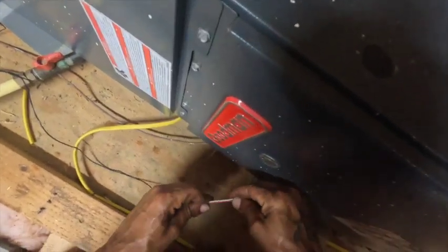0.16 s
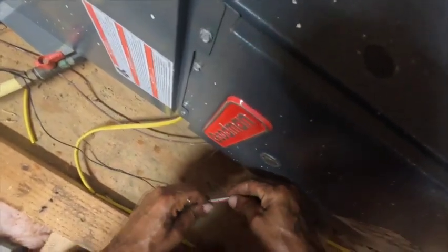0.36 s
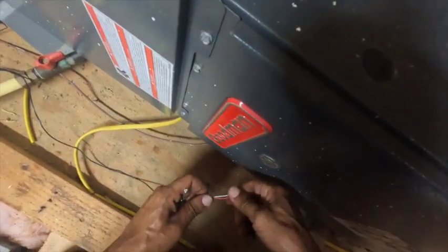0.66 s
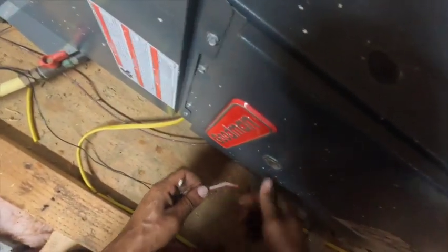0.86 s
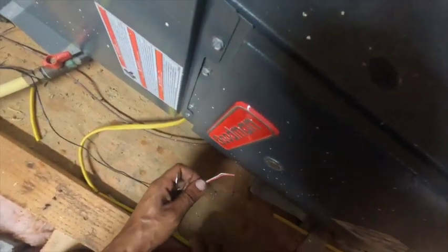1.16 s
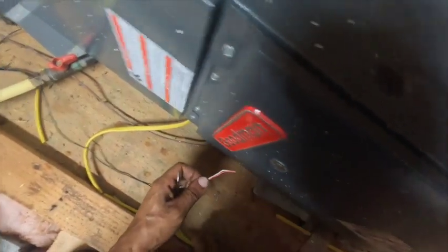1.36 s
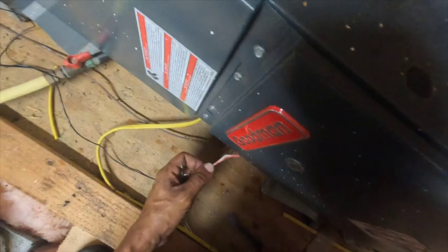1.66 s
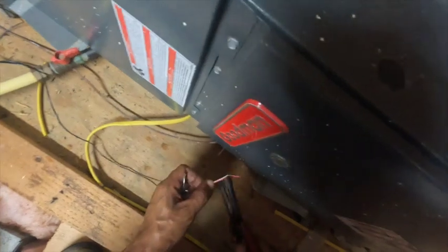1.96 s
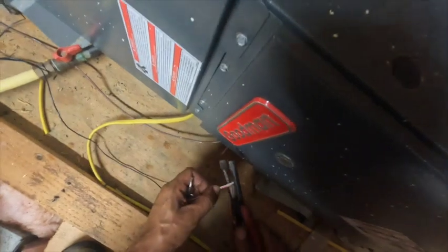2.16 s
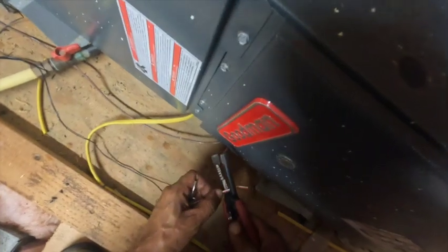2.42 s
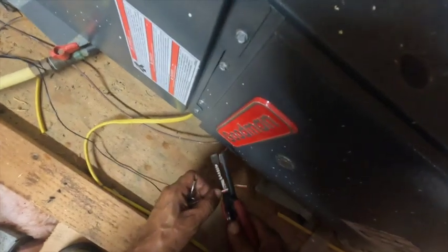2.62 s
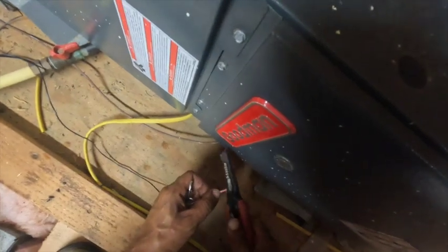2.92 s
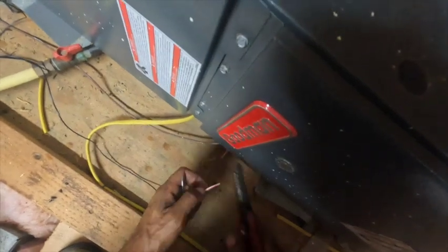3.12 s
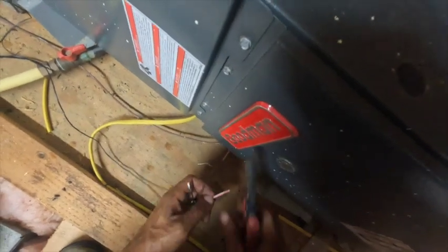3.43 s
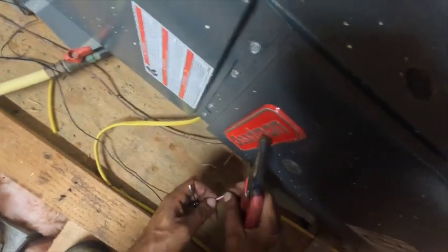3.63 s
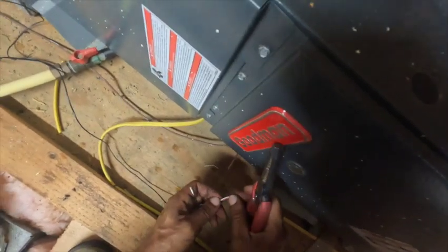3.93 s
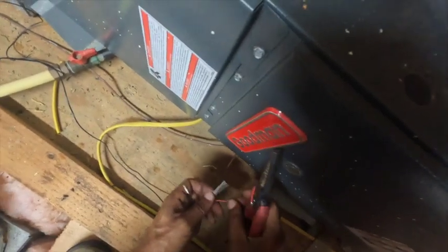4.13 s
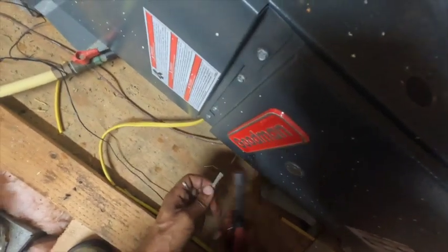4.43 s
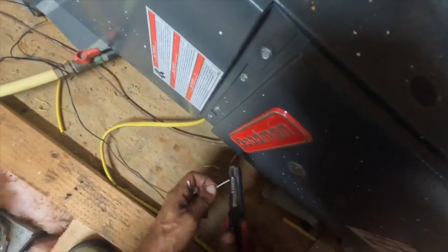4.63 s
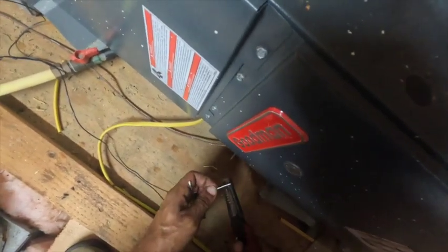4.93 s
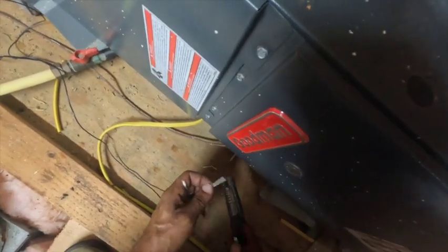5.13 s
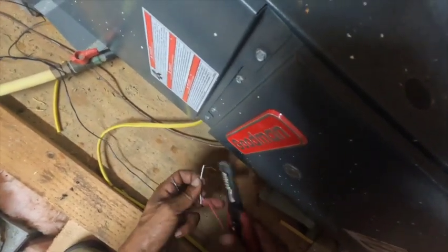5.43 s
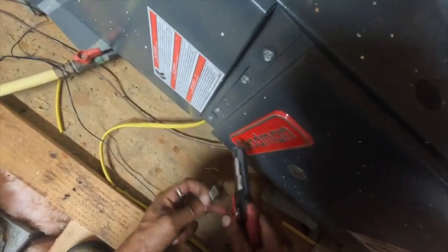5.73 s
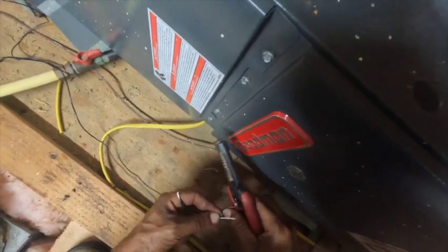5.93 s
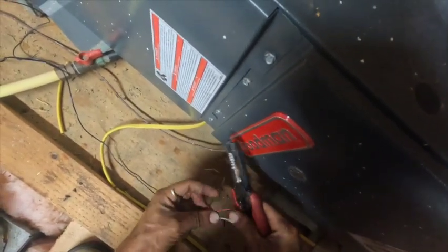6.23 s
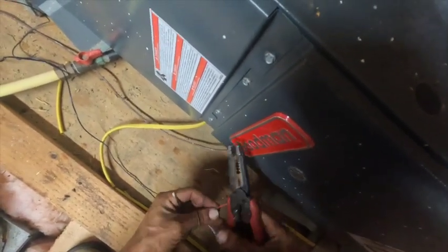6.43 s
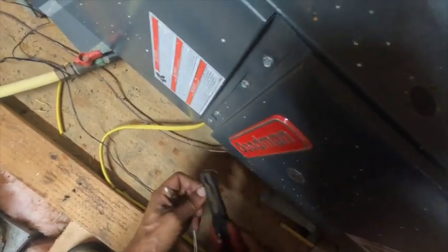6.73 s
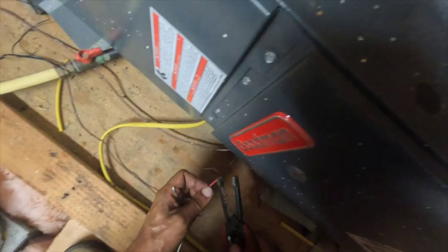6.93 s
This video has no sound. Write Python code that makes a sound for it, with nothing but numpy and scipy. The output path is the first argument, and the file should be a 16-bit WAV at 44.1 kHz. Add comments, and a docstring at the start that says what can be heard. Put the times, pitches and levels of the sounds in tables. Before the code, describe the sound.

A steady deep blower rumble with soft hum and hiss fills an attic, heard through a small camera microphone near the hands. Strippers tick faintly, bite through thin wire with a sharp dry snap, and click open. A sheet-metal panel is bumped, with a quick bouncing clatter and short boom. Afterwards only thin high squeaks, light scraping, a tiny tick and dull handling bumps remain.

```python
"""Hand wire strippers in an attic: ticks at 1.6 s, a snip through thin wire at 2.9 s, jaws springing open at 3.1 s.
One knock on a sheet-metal furnace cabinet at 3.6 s, then thin squeaks and scrapes to 6.7 s, a soft tick at 4.8 s.
Contacts are swung-up steel modes over coloured grit; the panel is decaying modes under band-damped noise.
Throughout: a blower's low rumble, hum and duct hiss, camera hiss throbbing with its frames, soft handling bumps."""
import sys
import numpy as np
from scipy import signal
from scipy.fft import rfft, irfft
from scipy.io import wavfile
from scipy.ndimage import uniform_filter1d

SR = 44100
rng = np.random.default_rng(int(sys.argv[2]) if len(sys.argv) > 2 else 0)


def unload_wav(signal):
    """Save mono or channel-first audio to the path in sys.argv[1] as 16-bit WAV at rate SR, clipped to [-1, 1]."""
    wavfile.write(
        sys.argv[1],
        SR,
        np.round(np.clip(np.atleast_2d(signal).T, -1, 1) * 32767).astype(np.int16),
    )


N = 311787
T = np.arange(N) / SR
HZ = np.fft.rfftfreq(N, 1 / SR) + 1e-3

# Colour tables: relative spectral density. Pan: left minus right.
# Steel contacts: [t/s, level/dB, main ring f/Hz, contact/ms, upper ring/dB re main, body/dB, echo send/dB]
CONTACTS = [(1.564, -37.5, 5150, 4.6, 4, -7, -1.5), (1.569, -46.5, 2820, 6.7, -25, 7, -12),
            (1.572, -43, 4730, 3.5, -8, -18, -6), (1.582, -45, 4850, 3.4, 3, 5, -7),
            (2.925, -36.5, 5110, 1.7, -16, -5, -7), (2.9429, -28, 4970, 2.6, -7, 9, -12),
            (2.9468, -8.5, 4810, 2.46, -15, -4, -11), (2.9509, -15.5, 4380, 0.76, -16, -4, -18),
            (2.9565, -26, 4500, 1.7, -17, 4, -10), (2.9632, -40, 4930, 1.2, -12, -6, -10),
            (3.119, -46, 4840, 5, -16, 5, -4), (3.1248, -31.5, 5190, 3.2, -11, 1, -2.5),
            (3.135, -48, 4530, 5, 9, 0, -5), (3.2038, -37.5, 4240, 2.3, 0, 5, -1),
            (3.2074, -42.5, 2900, 4.2, -8, 9, -5), (4.778, -54, 2900, 4.1, -20, -7, -13)]
# Handles ringing on faintly: [f/Hz, relative level/dB, t60/s]
HANDLE_MODES = [(1264, -40, 0.052), (1696, -36.5, 0.031), (2020, -36, 0.057), (3300, -62, 0.04)]
# Jaws as the microphone cavity colours them: [f/Hz, level/dB]
SNAP_COLOUR = [(410, -68), (700, -32), (1970, -14), (2730, -18), (3140, -17), (3900, -9), (4820, -10.5),
               (5630, -16.5), (6750, -3), (7250, -23), (8050, -28), (8740, -16.5), (9950, -21.5),
               (11300, -27), (12200, -26), (15500, -50)]
# Snap as it comes back from all sides: [f/Hz, level/dB]
SCATTER_COLOUR = [(880, -31), (1500, -24), (1720, -8.5), (2120, -25), (2340, -16), (3060, -5.5), (3540, -9),
                  (3780, -5), (4540, -4.5), (4950, -3), (5950, -11.5), (6490, -10.5), (7570, -24),
                  (10400, -25), (15000, -41)]
EDGE_DB, EDGE_DB_PER_DB = 9, 0.4  # harder contacts have sharper edges
UPPER_RING_HZ, RING_T60_S = 6760, 0.0018
GRIT_DB, GRIT_SHARE = -6, 0.73  # re modes; part of a contact in which grit fades
BODY_TOP_HZ = 4120
HAND_PAN_DB = -0.5
TAIL_DB, TAIL_T60_S, TAIL_ALIKE = -23.5, 0.19, 1  # attic echoes; channel likeness 0-1

# Thin squeaks of the tool: [t/s, length/s, start f/Hz, rise/Hz, level/dB, octave/dB re fundamental]
SQUEAKS = [(4.325, .13, 2810, 80, -75, -25), (4.505, .055, 4960, 60, -69.5, -13),
           (4.585, .05, 4960, 60, -69.5, -13), (4.905, .175, 5240, 180, -69.5, -25),
           (4.9, .09, 4850, 100, -72, -25), (4.99, .075, 3900, 60, -78, -25),
           (5.02, .1, 4900, 120, -72.5, -25), (5.5, .36, 4920, 60, -73.5, -13),
           (5.52, .38, 2720, 60, -81.5, -25), (6.5, .055, 2840, 60, -78, -25),
           (6.565, .09, 2800, 145, -73, -25)]
SQUEAK_BLUR_HZ, SQUEAK_FLUTTER_DB = 30, 2.2
SQUEAK_RISE_SHARE = 0.3  # time constant of the pitch rise, part of length
# A brief hiss swell, then jaws and fingers sliding along the wire from 4.86 s: [t/s, length/s, level/dB]
GRIT_SWELLS = [(3.3, .035, -67), (4.86, 0.22, -67.5), (5.477, 0.16, -68.5), (5.58, 0.4, -68.5)]
SCRAPE_HZ, SCRAPE_WIDTH_HZ, SCRAPE_ROUGH_DB = 5120, 1350, 1.5

# Knock on the cabinet, blow and bounces: [t/s, clatter level/dB, brightness/dB per octave]
KNOCKS = [(3.6409, -40, -0.5), (3.648, -39.5, 5), (3.681, -50, -4)]
# Lowest panel modes: [f/Hz, level/dB re BOOM_DB, t60/s]
PANEL_MODES = [(72.6, 0, 0.3), (130, -4.5, 0.27), (168, -4.5, 0.4), (203, 0, 0.37), (263, -13.5, 0.29),
               (230, -11, 0.33), (311.5, -14, 0.27), (700, -22, 0.15), (921, -11, 0.13), (1042, -9, 0.12),
               (1083, -6, .09), (1188, -13, 0.26), (1246, -10, 0.26), (1545, -24, 0.16), (1748, -12, 0.11),
               (2730, -12, 0.12)]
# Dense upper panel modes: [f/Hz, level/dB]
CLATTER_COLOUR = [(180, -38), (300, -1.5), (494, -14.5), (750, -11), (1090, -2), (1380, -3.5), (1820, -2.5),
                  (2350, -15), (2800, -3.5), (3510, -9.5), (4770, -4), (6170, -4.5), (6790, -0.5),
                  (8240, -24.5), (12300, -35), (14000, -53)]
# Their decay: [f/Hz, t60/s]
CLATTER_T60 = [(300, 0.34), (1200, 0.21), (3000, 0.24), (6000, 0.053), (12000, 0.055)]
BOOM_DB, SWING_CYCLES = -38.5, 1.5
KNOCK_PAN_DB = 1.5

# Soft bumps as hands and camera shift: [t/s at centre, level/dB, f/Hz, 1/e half-width/ms]
BUMPS = [(1.25, -68, 149, 170), (1.57, -56, 135, 32), (2.96, -55, 85.4, 50), (4.59, -55.5, 84, 64),
         (5.22, -63, 68, 67), (6.82, -58, 110, 63)]

# Blower hum through the floor boards: [f/Hz, level/dB]
HUM_COLOUR = [(32, -51), (55, -4.5), (65, -1), (86, -1.5), (141, -2), (173, -1), (277, -10.5), (310, -11.5),
              (463, -19.5), (850, -29.5), (1100, -27), (1870, -120)]
HUM_START_DB, HUM_SAG_DB_PER_S, HUM_DRIFT_DB = -61, 0.28, -1.9
# Duct hiss: [f/Hz, level/dB]
AIR_COLOUR = [(410, -7), (700, -10.5), (830, -11.5), (1020, -5), (1300, -0.5), (1420, -4.5), (1730, 2.5),
              (2320, -8), (2750, -4), (3140, -9.5), (4100, -13), (5330, -12.5), (9020, -120)]
AIR_DB = -67

# Camera hiss: [f/Hz, level/dB]
HISS_COLOUR = [(2350, -29.5), (4000, -6.5), (4960, 2), (5960, 1), (6330, -2.5), (6620, -2), (7110, -6.5),
               (8160, -14), (9530, -14), (10900, -14.5), (11500, -23.5), (13400, -28), (14400, -63),
               (15000, -37)]
HISS_DB = -66.5
FRAME_HZ = 30000 / 1001
# Two hiss swells per frame: [t/ms into frame, 1/e half-width/ms, mean swell/dB in the high band]
THROB = [(5.5, 5.0, 6.5), (22.2, 3.2, 8.0)]
ODD_FRAME_DB = 1

# Slow air pressure at the microphones, before gusts: [t/s, level/dB]
RUMBLE_LEVEL = [(0, -30), (1.5, -29.5), (3, -30), (3.8, -34), (4.7, -30), (7.07, -33.5)]
# Its spectrum: [f/Hz, level/dB]
RUMBLE_COLOUR = [(3, 2), (5, 9.5), (16, 14), (26, 1.5), (34, 1), (40, -10), (46, -41), (54, -10.5),
                 (62, -69), (120, -150)]
GUST_DB, GUST_RATE_HZ = 2.5, 14
LOW_PAN_DB = -4  # rumble, boom, bumps

# Likeness of the noise channels: [f/Hz, likeness 0-1]
ALIKE = [(60, 0.7), (130, 1), (290, 0.3), (640, 0.4), (1410, 0.66), (3100, 0.94), (6820, 1), (15000, 0.5)]
# Noise pan: [f/Hz, left minus right/dB]
NOISE_PAN = [(60, 2.5), (110, 1.5), (200, -7), (380, -6.5), (700, -7.5), (1290, -0.5), (2380, 4.5),
             (4400, -1), (8120, 0), (15000, 3.5)]
# Phase lead of left in noise; contacts take 1.6 times this: [f/Hz, lead/rad]
LEFT_LEAD = [(0, -0.086), (260, 0.51), (780, -1.32), (1720, -0.46), (2840, -1.23), (3360, -0.87),
             (3960, -1.1), (4220, -0.9), (5170, 0.25), (8960, 0.21), (10500, 0.37), (13100, -0.83),
             (15200, 0.11)]
TOP_HZ = 15600


def strippers():
    """Ticks, the snip with its rebounds, the jaws springing open: steel contacts and their echoes."""
    direct, sent = np.zeros((2, N)), np.zeros((1, N))
    for s, db, ring_hz, contact_ms, upper_db, body_db, echo_db in CONTACTS:
        edge_db = EDGE_DB + EDGE_DB_PER_DB * db
        ahead, around = undb(db) * strike(ring_hz, contact_ms, upper_db, body_db, edge_db)
        add(direct, s, sides(HAND_PAN_DB) * ahead)
        add(sent, s, undb(echo_db) * around[None])
    # round the camera body the two ports differ in phase
    turn = np.exp(.8j * over_hz(LEFT_LEAD) * np.array([[1], [-1]]))
    return irfft(rfft(direct + attic(sent[0])) * turn, N)


def strike(ring_hz, contact_ms, upper_db, body_db, edge_db):
    """Two jaw modes swing up during contact, over edge and handle grit; direct (peak 1) and scattered sound."""
    bins = np.fft.rfftfreq(4096, 1 / SR) + 1
    body_shelf_db = body_db / (1 + (bins / BODY_TOP_HZ) ** 8)
    edge_shelf_db = edge_db / (1 + (7800 / bins) ** 8)
    colour_db = body_shelf_db + edge_shelf_db
    snap = causal(np.maximum(over_hz(SNAP_COLOUR, bins), -70) + colour_db)
    snap = snap + undb(edge_db + body_db) * ring(HANDLE_MODES, count=4096)
    around = causal(np.maximum(over_hz(SCATTER_COLOUR, bins), -70) + colour_db)
    t = T[:1024]
    phase = t * 1000 / max(contact_ms, .2)
    touch = np.sqrt(phase) * np.exp(-phase ** 4)  # the edges part abruptly
    scratch = rng.standard_normal(len(t)) * touch * np.exp(-phase / GRIT_SHARE)
    grit = signal.fftconvolve(snap, scratch)
    swing = np.convolve(touch, 1000 ** (-t / RING_T60_S))[:len(t)]
    start = 2 * np.pi * rng.random(size=2)
    main = np.sin(2 * np.pi * ring_hz * t + start[0])
    upper = undb(upper_db) * np.sin(2 * np.pi * UPPER_RING_HZ * t + start[1])
    modes = swing * (main + upper)
    ahead = np.pad(modes / np.linalg.norm(modes), (0, len(grit) - len(t)))
    ahead = ahead + undb(GRIT_DB) * grit / np.linalg.norm(grit)
    return np.array([ahead, np.pad(around, (0, len(t) - 1))]) / np.abs(ahead).max()


def attic(x):
    """Dense short echoes from rafters and cabinet, building within about a millisecond."""
    t = T[:SR // 2]
    mid, side = rng.standard_normal((2, len(t)))
    echoes = np.array([mid + (1 - TAIL_ALIKE) * side, mid - (1 - TAIL_ALIKE) * side])
    echoes = echoes * 1000 ** (-t / TAIL_T60_S) * (1 - np.exp(-(t / 0.0005) ** 2))
    soft = signal.sosfilt(signal.butter(1, 7000, fs=SR, output="sos"), echoes)
    echoes = soft + (echoes - soft) * np.exp(-t / 0.017)  # the top dies first
    return undb(TAIL_DB) * signal.fftconvolve(x[None], echoes, axes=1)[:, :N]


def handling():
    """Squeaks: rising, blurred tones with their octave; scrapes: rough band-passed grit."""
    blur = np.cumsum(SQUEAK_BLUR_HZ * walk(300)) / SR
    flutter = undb(SQUEAK_FLUTTER_DB * walk(30))
    squeaks = 0
    for s, length, hz, rise_hz, db, octave_db in SQUEAKS:
        settle_s = SQUEAK_RISE_SHARE * length
        settling = rise_hz * settle_s * np.exp(-np.maximum(T - s, 0) / settle_s)
        phase = 2 * np.pi * ((hz + rise_hz) * T + settling + blur)
        tone = np.sin(phase) + undb(octave_db) * np.sin(2 * phase)
        squeaks = squeaks + np.sqrt(2) * undb(db) * window(s, length) * flutter * tone
    edges = [SCRAPE_HZ - SCRAPE_WIDTH_HZ / 2, SCRAPE_HZ + SCRAPE_WIDTH_HZ / 2]
    grit = signal.sosfilt(signal.butter(2, edges, "band", fs=SR, output="sos"), rng.standard_normal(N))
    grit = grit / np.std(grit) * undb(SCRAPE_ROUGH_DB * walk(50))
    swells = sum(undb(db) * window(s, length) for s, length, db in GRIT_SWELLS)
    return sides(HAND_PAN_DB) * (squeaks + grit * swells)


def cabinet():
    """A blow with two bounces on sheet metal: clatter with a decay per band, and a boom of low modes."""
    out, t = np.zeros((2, N)), T[:16384]
    bins = np.fft.rfftfreq(len(t), 1 / SR) + 1
    centres_hz = 300 * 2 ** np.arange(0, 5.6, .5)
    for s, clatter_db, bright_db in KNOCKS:
        mid, side = rfft(rng.standard_normal((2, len(t))))
        colour = undb(over_hz(CLATTER_COLOUR, bins) + bright_db * np.log2(bins / 2000))
        pair = np.array([mid + 0.35 * side, mid - 0.5 * side]) * colour
        pair = pair / np.std(irfft(pair))
        clatter = 0
        for hz, t60 in zip(centres_hz, over_hz(CLATTER_T60, centres_hz)):
            band = np.clip(1 - 2 * abs(np.log2(bins / hz)), 0, 1)
            clatter = clatter + irfft(pair * band) * 1000 ** (-t / t60)
        onset = 1 - np.exp(-t / 0.00014)
        add(out, s, sides(KNOCK_PAN_DB) * undb(clatter_db) * clatter * onset)
    # each mode needs a few cycles to swing up
    boom = 0
    for mode in PANEL_MODES:
        boom = boom + ring([mode], count=len(t)) * (1 - np.exp(-t * mode[0] / SWING_CYCLES))
    add(out, KNOCKS[0][0], sides(LOW_PAN_DB) * undb(BOOM_DB) * boom)
    return out


def bumps():
    """Short dull thuds carried through the camera body: low band-passed noise in bell envelopes."""
    out = 0
    for s, db, hz, ms in BUMPS:
        band = signal.butter(2, [0.31 * hz, 1.45 * hz], "band", fs=SR, output="sos")
        thud = signal.sosfilt(band, rng.standard_normal(N))
        out = out + undb(db) * thud / np.std(thud) * np.exp(-((T - s) * 1000 / ms) ** 2)
    return sides(LOW_PAN_DB) * out


def blower():
    """Hum in the boards and hiss from the ducts: coloured noise, each flickering a little."""
    flicker_db = HUM_DRIFT_DB * walk(1.1) + 0.81 * walk(13)
    hum = noise(HUM_COLOUR) * undb(HUM_START_DB - HUM_SAG_DB_PER_S * T + flicker_db)
    air = noise(AIR_COLOUR) * undb(AIR_DB + 0.5 * walk(0.42) + 1.05 * walk(13))
    return hum + air


def camera_hiss():
    """Hiss that swells in step with the frames, each swell its own size, strongest in the top octave."""
    period_ms = 1000 / FRAME_HZ
    throb_db = 0
    for at_ms, width_ms, swell_db in THROB:
        frame, ms = np.divmod(T * 1000 - at_ms + period_ms * 1.5, period_ms)
        size = 1 + 0.55 * np.tanh(rng.standard_normal(N // 1000))[frame.astype(int)]
        throb_db = throb_db + swell_db * size * np.exp(-((ms - period_ms / 2) / width_ms) ** 2)
    # every other frame draws more current
    throb_db = throb_db - throb_db.mean() + ODD_FRAME_DB * np.cos(np.pi * FRAME_HZ * (T - .039))
    hiss = noise(HISS_COLOUR) * undb(HISS_DB + 0.31 * walk(3.53))
    low = signal.sosfiltfilt(signal.butter(4, 8200, fs=SR, output="sos"), hiss)
    high = hiss - low
    return low * undb(0.55 * throb_db + 1.0 * walk(16)) + high * undb(throb_db + 0.61 * walk(38))


def rumble():
    """Slow pressure swings of the blower, mostly below hearing: one gusting noise wave at both ports."""
    wave = irfft(rfft(rng.standard_normal(N)) * undb(over_hz(RUMBLE_COLOUR)), N)
    fades = signal.windows.tukey(N, .015)  # short, at both ends, so the cut makes no click
    level = undb(curve(RUMBLE_LEVEL) + GUST_DB * walk(GUST_RATE_HZ))
    return sides(LOW_PAN_DB) * fades * wave / np.std(wave) * level


def noise(colour):
    """Stereo noise as two close microphone ports hear it; rms 1 in the mean of the channels."""
    mid, side = rfft(rng.standard_normal((2, N)))
    alike = np.clip(over_hz(ALIKE), 0, 1)
    half = undb(over_hz(NOISE_PAN) / 2) * np.exp(.5j * over_hz(LEFT_LEAD))
    mid, side = mid * np.sqrt(1 + alike), side * np.sqrt(1 - alike)
    spectra = np.array([(mid + side) * half, (mid - side) / half])
    pair = irfft(undb(over_hz(colour)) * spectra, N)
    return pair / np.std(pair.mean(axis=0))


def ring(modes, count):
    """Decaying sines from one blow, pitches a little different each time."""
    t = T[:count]
    hz, db, t60 = np.transpose(modes)[:, :, None]
    hz = hz * (1 + 0.0041 * rng.standard_normal(hz.shape))
    return (undb(db) * np.sin(2 * np.pi * hz * t) * 1000 ** (-t / t60)).sum(axis=0)


def causal(db):
    """Minimum-phase response with these dB at even frequency steps, by folded cepstrum; energy 1."""
    cepstrum = irfft(db * np.log(10) / 20)
    half = len(cepstrum) // 2
    cepstrum[1:half] *= 2
    cepstrum[half + 1:] = 0
    out = irfft(np.exp(rfft(cepstrum)))
    return out / np.sqrt(np.sum(out ** 2))


def walk(rate_hz):
    """Random levels held 1 / rate_hz s and smoothed twice; spread near 1."""
    k = int(SR / rate_hz)
    steps = np.repeat(rng.standard_normal(N // k + 1), k)
    return 1.3 * uniform_filter1d(uniform_filter1d(steps, k), k)[:N]


def window(s, length):
    """A soft rise and fall between s and s + length."""
    return np.sin(np.pi * np.clip((T - s) / length, 0, 1)) ** .35


def add(track, s, sound):
    """Mix a sound in at s seconds."""
    i = int(s * SR)
    track[:, i:i + sound.shape[1]] += sound


def undb(db):
    """Decibels to gain."""
    return 10 ** (np.asarray(db) / 20)


def sides(pan_db):
    """Left and right gains."""
    return undb(np.array([[pan_db], [-pan_db]]) / 2)


def curve(rows):
    """A [t/s, value] table at every sample."""
    return np.interp(T, *np.transpose(rows))


def over_hz(rows, bins=HZ):
    """A [f/Hz, value] table at every frequency bin, linear in log frequency."""
    hz, value = np.transpose(rows)
    return np.interp(np.log(bins), np.log(hz + 1), value)


def scene():
    """Hand work and its echoes over blower and camera noise."""
    return strippers() + cabinet() + bumps() + rumble() + blower() + camera_hiss() + handling()


def record(dry):
    """The camera cuts the top: steep low-pass."""
    return signal.sosfilt(signal.ellip(8, .2, 70, TOP_HZ, fs=SR, output="sos"), dry)


dry = scene()
out = record(dry)
unload_wav(out)
```